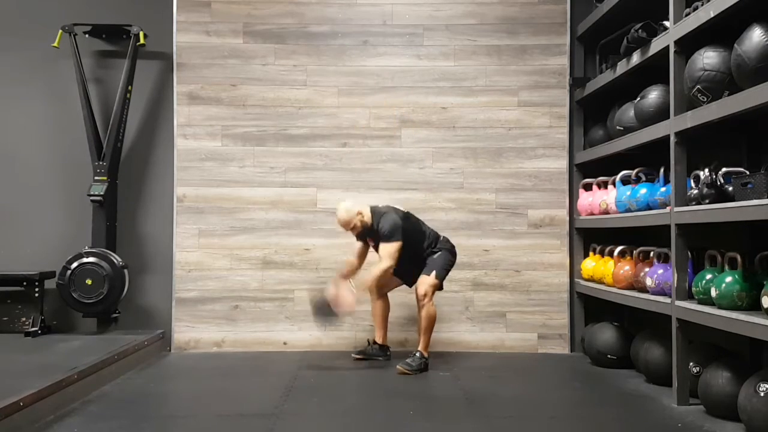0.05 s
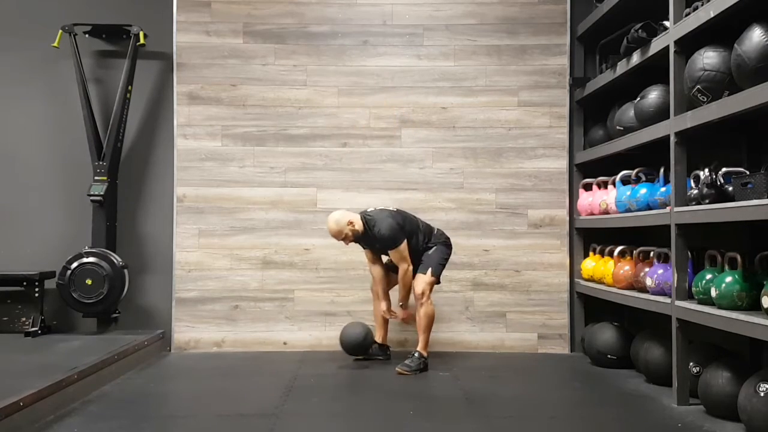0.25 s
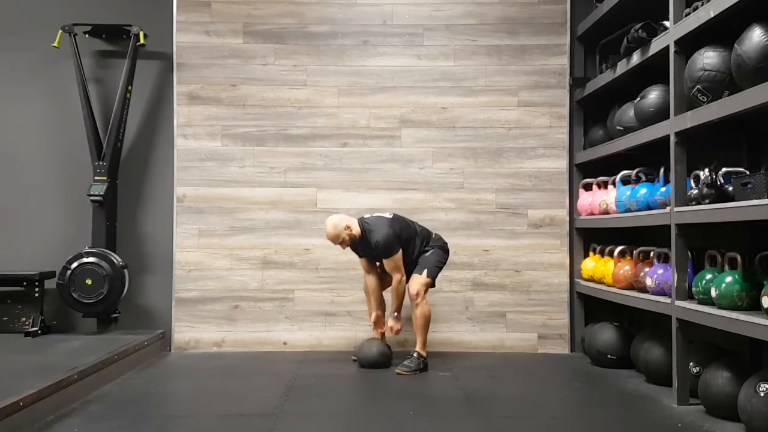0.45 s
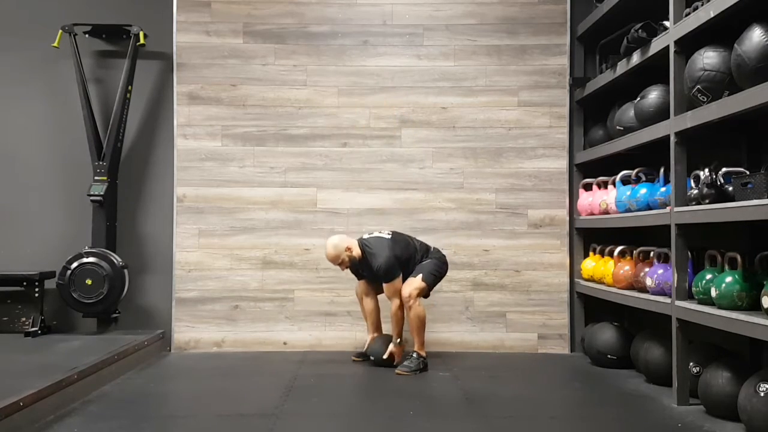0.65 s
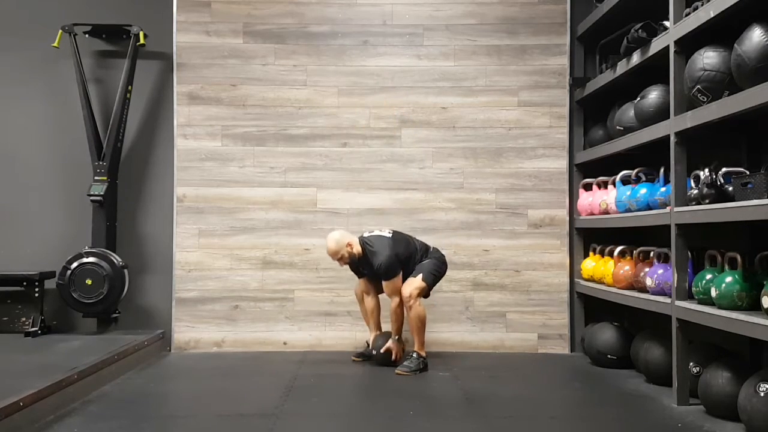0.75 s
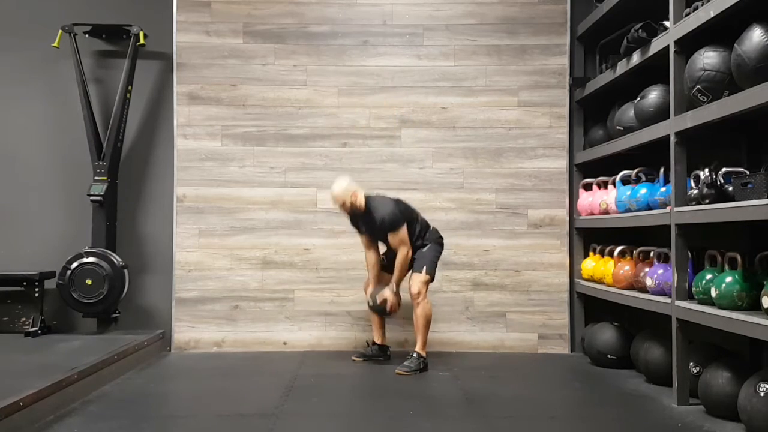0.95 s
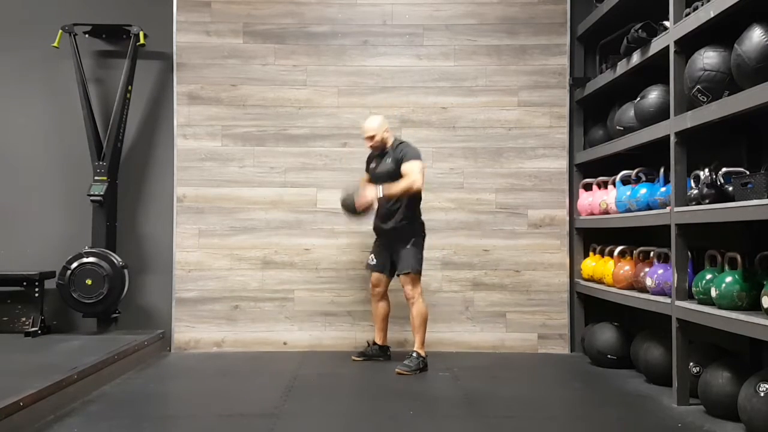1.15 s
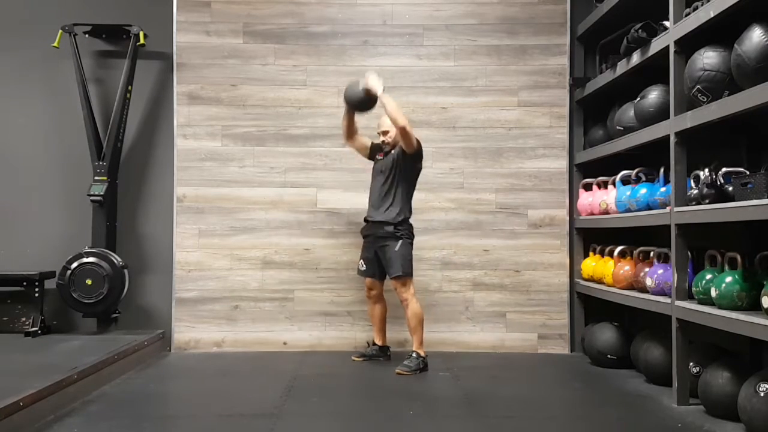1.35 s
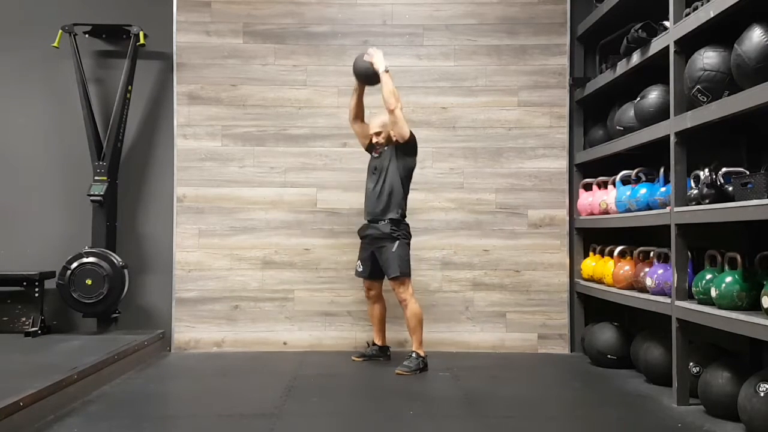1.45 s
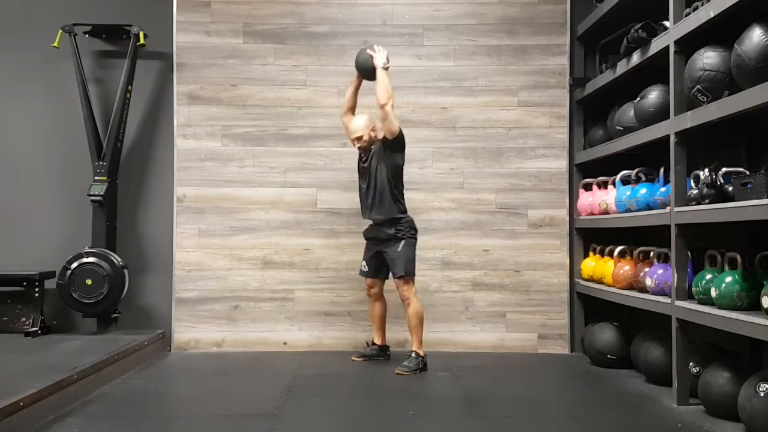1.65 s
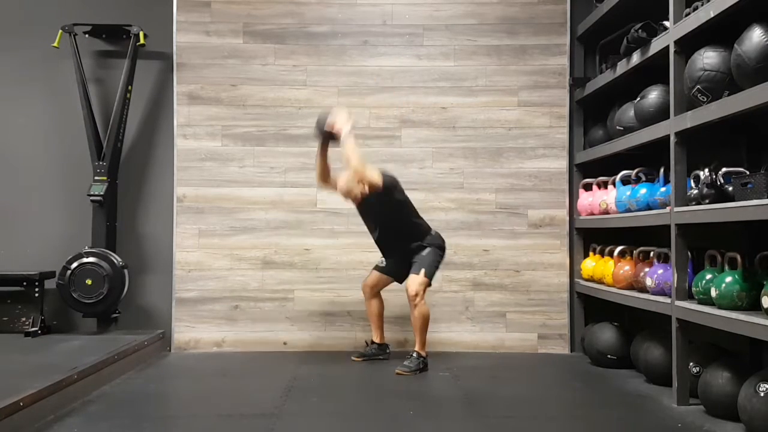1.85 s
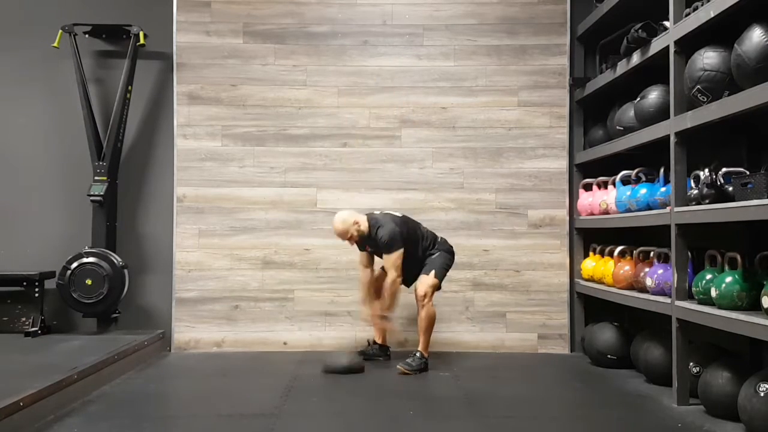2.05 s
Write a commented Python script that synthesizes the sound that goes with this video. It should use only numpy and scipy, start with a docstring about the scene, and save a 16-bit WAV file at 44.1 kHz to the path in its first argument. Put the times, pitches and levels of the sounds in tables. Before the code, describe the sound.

A heavy rubber ball slams on a gym floor almost at once, a sharp slap and deep boom with a one-second reverberant tail, then soft handling knocks and clothing swishes over low ventilation rumble, heard from a few metres.

```python
"""Heavy ball slam in a hard gym

A few metres from the microphones a heavy rubber ball is slammed on the floor: a short boom of gliding, decaying
sines and a sharp filtered pulse, which the wall behind throws back; the room rings for about a second as fading
noise. Air rushes ahead of the ball. It lands once more, softly, then is picked up and swung overhead: clothes
swish and further light knocks sound, all made of shaped noise. Ventilation rumbles throughout as steady, bass-
heavy noise."""
import sys
import numpy as np
from scipy import signal
from scipy.fft import rfft, irfft
from scipy.io import wavfile

SR = 44100
rng = np.random.default_rng(int(sys.argv[2]) if len(sys.argv) > 2 else 0)


def transcribe(signal):
    """Save signal, clipped to [-1, 1], as a 16-bit WAV file at the path in sys.argv[1]."""
    frames = np.atleast_2d(signal).T
    limited = np.clip(frames, -1, 1)
    pcm = np.round(limited * 32767).astype(np.int16)
    wavfile.write(sys.argv[1], SR, pcm)


N = 92610
T = np.arange(N) / SR  # t/s

# ventilation spectrum [f/Hz, level/dB per Hz]
VENT_COLOUR = [(12, -41.5), (20, -8), (38, -2.5), (92, -5), (202, -13.5), (232, -16), (266, -10),
               (306, -19.5), (649, -23.5), (932, -28), (1040, -23.5), (1580, -31), (2330, -30.5),
               (6360, -46.5), (15500, -46)]
VENT_DB = -56
# likeness of the left and right channels in diffuse sound [f/Hz, correlation]
LEFT_RIGHT_LIKENESS = [(60, 1), (150, 0.94), (290, 0.91), (640, 0.58), (1400, 0.079), (3100, 0.16),
                       (15000, 0.085)]
# lean of the action between the channels [f/Hz, left minus right level/dB]
LEFT_LEAD = [(100, 0), (350, 0), (700, 0.5), (4400, 0), (6500, -2), (9000, 9.5), (15000, 5)]

# swishes of clothing as the arms move [peak t/s, level/dB, rise constant/s, fall constant/s]
SWISHES = [(0.187, -50, 0.02, 0.064), (.57, -62, 0.044, 0.057), (.83, -67.5, 0.046, 0.026),
           (1.001, -64, 0.038, 0.042), (1.335, -63.5, 0.072, 0.041), (2.028, -70.5, 0.075, 0.21)]
# spectrum of sliding fabric [f/Hz, level/dB per Hz]
CLOTH_COLOUR = [(200, -15), (1200, 5.5), (3200, 0.5), (6500, -2), (9000, -11), (13000, -7), (16000, -29)]

# light knocks of hands and ball [t/s, level/dB, body f/Hz, body width/octaves,
#   treble level/dB, treble limit f/Hz, rise constant/s, t60/s, room level/dB re knock]
KNOCKS = [(.538, -36.5, 624, 0.64, -7.5, 3040, 0.0023, 0.15, -10.5),
          (1.5599, -42, 490, 0.44, -10, 14100, 0.00098, 0.1, -13),
          (2.0335, -46, 700, 0.53, -14, 2700, 0.00025, 0.082, -8.5)]
# bright edge of a knock, before its own treble level and limit [f/Hz, level/dB per Hz]
KNOCK_TREBLE = [(60, -50), (300, -3), (900, -1), (2400, -0.5), (3600, -7), (5000, -13.5), (9000, -20),
                (15000, -17)]
# the ball's own low note in every knock, relative to the body
THUMP_DB, THUMP_HZ, THUMP_WIDTH_OCT = -0.5, 230, 0.38

# air pushed ahead of the falling ball [f/Hz, level/dB per Hz]
RUSH_COLOUR = [(60, -16.5), (220, -4), (600, -3), (1200, -16.5), (4000, -33.5), (15000, -57)]
RUSH_DB, RUSH_RISE_S = -39.5, 0.021

# what the room returns of the slam [f/Hz, level/dB per Hz]
HALL_COLOUR = [(18, -39), (35, -25), (76, -4.5), (125, -7.5), (170, -4.5), (230, -2), (280, -3.5),
               (335, -17), (410, -10), (490, -13), (630, -18.5), (950, -21.5), (1700, -20), (2900, -25),
               (5500, -39), (8000, -46), (12500, -51), (15500, -58)]
# reverberation time of the room [f/Hz, t60/s]
HALL_T60 = [(50, 1.24), (100, 1.22), (240, 1.096), (400, 1.052), (1000, 0.93), (2500, 0.79), (5000, .65),
            (8000, 0.39), (12000, 0.32)]
HALL_DB, HALL_BUILD_S = -17.5, 0.0013
HALL_HOLD_S = 0.056  # the tail falls slowly at first, then at its full rate
# standing waves between the gym's walls [f/Hz, level/dB, t60/s]
STANDING_WAVES = [(103.4, -25.5, 1.14), (191, -27.5, 1.08), (227.5, -19.5, 0.89), (257, -28, 0.84)]
CEILING_S, CEILING_DB, CEILING_HZ = 0.0262, -8.5, 199  # delay, level and upper limit of the overhead return
# dense scatter off the shelves and near walls [f/Hz, level/dB per Hz]
EARLY_COLOUR = [(40, -18), (200, 0), (450, -2), (900, -3), (2500, -12), (5000, -20), (8000, -31),
                (12500, -37), (16000, -38)]
EARLY_DB, EARLY_T60_S = -18, 0.23
EARLY_WIDTH = 0.67  # share left wide; the rest is heard from the front

CONTACT_S, SLAP_S = 0.2105, 0.218  # the ball touches the floor; its skin slaps flat
# the slap and its first reflections [delay/s, level/dB before SLAP_DB, left minus right level/dB]
SLAP_PATHS = [(0, -1.5, -1), (.0046, -4, 1), (.0134, -16.5, 5.5), (.026, -11.5, -1.5)]
# spectrum of the slap [f/Hz, level/dB before SLAP_DB]
SLAP_COLOUR = [(60, -19), (400, -2.5), (1500, 4.5), (3000, -3.5), (6000, -15.5), (9000, -29.5),
               (12500, -28), (16000, -23.5)]
SLAP_DB = 11.5
WALL_DULL_HZ = 7100  # reflections lose the treble above this
# ringing of the squashed ball [f/Hz once stiff, level/dB, t60/s]
BALL_MODES = [(247, 1, 0.15), (469.2, -17.5, 0.35), (160.2, -16.5, 0.29), (84.6, -31.5, 0.37),
              (44.2, -26, 0.59)]
SQUASH_S = 0.011  # time the boom takes to build up
SLACK, STIFFEN_S = 0.731, 0.01143  # the pitch starts low by this share and rises as the ball stiffens

TOP_HZ = 15300  # upper band limit


def amp(db):
    """Decibels to gain."""
    return 10 ** (np.asarray(db) / 20)


def unit(x):
    """Scaled to rms 1."""
    return x / np.sqrt(np.mean(x ** 2) + 1e-20)


def along(points, hz):
    """(f/Hz, value) points read on a log frequency axis."""
    f, v = np.transpose(points)
    return np.interp(np.log(hz + 1), np.log(f + 1), v)


def colour(points):
    """Gain against frequency from (f/Hz, level/dB) points."""
    return lambda hz: amp(along(points, hz))


def filtered(x, response):
    """x times a response of frequency, zero-padded to twice its length."""
    spectrum = rfft(x, 2 * N)
    hz = np.fft.rfftfreq(2 * N, 1 / SR)
    return irfft(spectrum * response(hz))[..., :N]


def causal(gain):
    """The minimum-phase response with this gain: no sound before its start."""
    cepstrum = irfft(np.log(np.maximum(gain, 1e-6)))
    cepstrum[1:N] *= 2
    cepstrum[N + 1:] = 0
    return np.exp(rfft(cepstrum))


def pan(db):
    """Left and right gains for a level difference."""
    return amp(np.array([[1], [-1]]) * db / 2)


def diffuse(gain):
    """Room-filling stereo noise of rms 1: bass alike in both channels, treble nearly unrelated."""
    def mid_side(hz):
        turn = np.arccos(np.clip(along(LEFT_RIGHT_LIKENESS, hz), -1, 1)) / 2
        return gain(hz) * np.array([np.cos(turn), np.sin(turn)])

    mid, side = filtered(rng.standard_normal((2, N)), mid_side)
    return unit(np.array([mid + side, mid - side]))


def burst(start, rise, t60):
    """Envelope: quick rise, exponential decay; zero before the start."""
    age = np.maximum(T - start, 0)
    return (1 - np.exp(-age / rise)) * amp(-60 * age / t60)


def ventilation():
    """Steady air noise from all around, heaviest in the bass."""
    return amp(VENT_DB) * diffuse(colour(VENT_COLOUR))


def hall(start, gain):
    """The room's tail after a blow: diffuse noise in which each frequency dies at its own speed."""
    hz, t, bins = signal.stft(diffuse(gain), SR, nperseg=1024)
    # slow at first, then the full rate of decay
    age = np.hypot(np.maximum(t - start, 0), HALL_HOLD_S) - HALL_HOLD_S
    fade = amp(-60 * age / along(HALL_T60, hz)[:, None])
    tail = signal.istft(bins * fade, SR, nperseg=1024)[1][:, :N]
    return tail * burst(start, HALL_BUILD_S, np.inf)


def standing_waves():
    """The boom sets a few low room modes ringing, each a decaying sine of random phase."""
    out = 0
    for hz, db, t60 in STANDING_WAVES:
        tone = np.sin(2 * np.pi * (hz * T + rng.random()))
        out = out + amp(db) * burst(SLAP_S, SQUASH_S, t60) * tone
    return out


def ceiling(x):
    """A dull, late copy from overhead: delayed and low-passed."""
    def response(hz):
        delay = np.exp(-2j * np.pi * hz * CEILING_S)
        return delay / (1 + (hz / CEILING_HZ) ** 4)

    return amp(CEILING_DB) * filtered(x, response)


def early_scatter():
    """Dense reflections off the shelves and near walls, as a short burst of narrowed noise."""
    wide = diffuse(colour(EARLY_COLOUR))
    scatter = EARLY_WIDTH * wide + (1 - EARLY_WIDTH) * wide.mean(axis=0)
    return amp(EARLY_DB) * scatter * burst(SLAP_S, HALL_BUILD_S, EARLY_T60_S)


def clothes():
    """Fabric slides with each quick move of the arms: noise swelling to a peak and falling away."""
    level = 0
    for peak_s, db, rise, fall in SWISHES:
        time_constant = np.where(T < peak_s, rise, fall)
        level = level + amp(db) * np.exp(-np.abs(T - peak_s) / time_constant)
    return level * diffuse(colour(CLOTH_COLOUR))


def hump(hz, centre, width):
    """Gain of a broad resonance, its width in octaves."""
    return 1 / (1 + (np.log2((hz + 1) / centre) / width) ** 4)


def knocks():
    """Each knock is damped noise with a body resonance, low thump and bright edge, answered by the room."""
    out = np.zeros((2, N))
    for start, db, body_hz, width, treble_db, limit_hz, rise, t60, room_db in KNOCKS:
        def gain(hz):
            body = hump(hz, body_hz, width)
            thump = amp(THUMP_DB) * hump(hz, THUMP_HZ, THUMP_WIDTH_OCT)
            edge = amp(treble_db + along(KNOCK_TREBLE, hz)) / (1 + (hz / limit_hz) ** 6)
            return body + thump + edge

        direct = diffuse(gain) * burst(start, rise, t60)
        room = amp(room_db) * hall(start, gain)
        out += amp(db) * (direct + room)
    return out


def air_rush():
    """Air noise swells ahead of the ball and stops at the slap."""
    before = SLAP_S - T
    swell = np.exp(-np.abs(before) / RUSH_RISE_S) * (before > 0)
    return amp(RUSH_DB) * diffuse(colour(RUSH_COLOUR)) * swell


def slap():
    """One sharp pressure pulse, repeated more dully by the nearest walls."""
    def response(hz):
        paths = 0
        for delay, db, side_db in SLAP_PATHS:
            arrival = np.exp(-2j * np.pi * hz * (SLAP_S + delay))
            dulling = np.hypot(1, (delay > 0) * hz / WALL_DULL_HZ)  # the direct path stays bright
            paths = paths + amp(db) * pan(side_db) * arrival / dulling
        return paths * causal(colour(SLAP_COLOUR)(hz))

    return -amp(SLAP_DB) * filtered(signal.unit_impulse(N), response)


def boom():
    """The ball flattens on the floor, stiffens so its pitch rises, and rings for a few cycles."""
    age = np.maximum(T - CONTACT_S, 0)
    squash = 1 - np.exp(-(age / SQUASH_S) ** 1.96)
    # integral of the rising pitch ratio, so a sine of it glides upward
    warped_age = age - SLACK * STIFFEN_S * (1 - np.exp(-age / STIFFEN_S))
    ringing = 0
    for hz, db, t60 in BALL_MODES:
        ringing = ringing + amp(db - 60 * age / t60) * np.sin(2 * np.pi * hz * warped_age)
    return squash * ringing


def slam():
    """Boom and slap, the ceiling's return, early scatter and the long tail with its room modes."""
    early = early_scatter()
    tail = amp(HALL_DB) * hall(SLAP_S, colour(HALL_COLOUR)) + standing_waves()
    thud = boom()
    return thud + ceiling(thud) + slap() + early + tail


def scene():
    """The exercise, its top treble leaning left, over steady ventilation."""
    action = slam() + air_rush() + knocks() + clothes()
    leaning = filtered(action, lambda hz: pan(along(LEFT_LEAD, hz)))
    return leaning + ventilation()


def record(dry):
    """The camera's microphones keep almost nothing above the band limit: a very steep low-pass."""
    return filtered(dry, lambda hz: 1 / np.sqrt(1 + (hz / TOP_HZ) ** 160))


dry = scene()
out = record(dry)
transcribe(out)
```